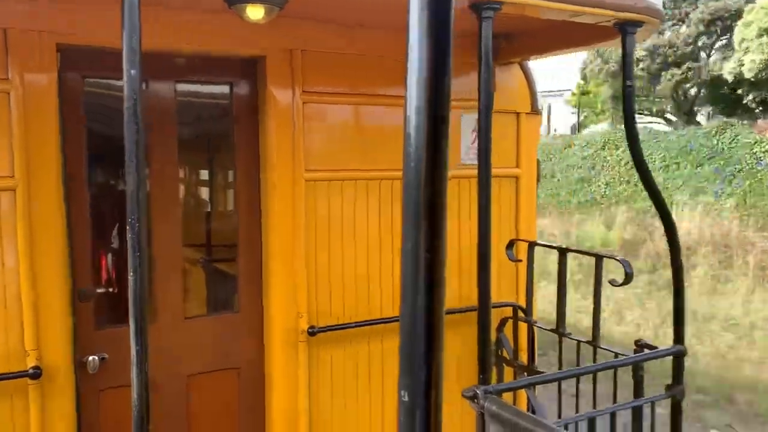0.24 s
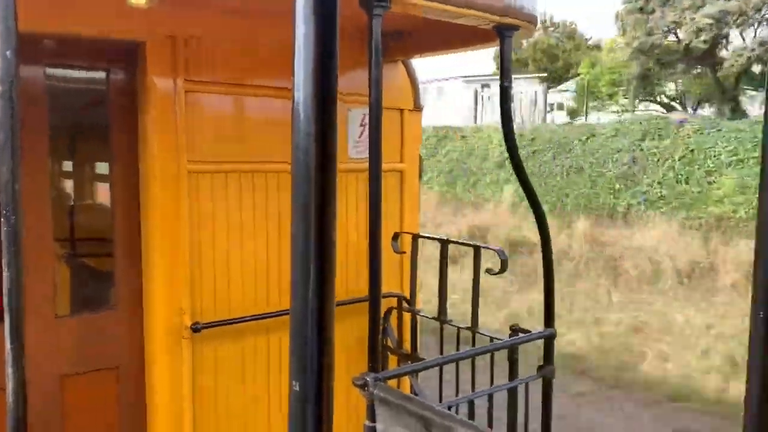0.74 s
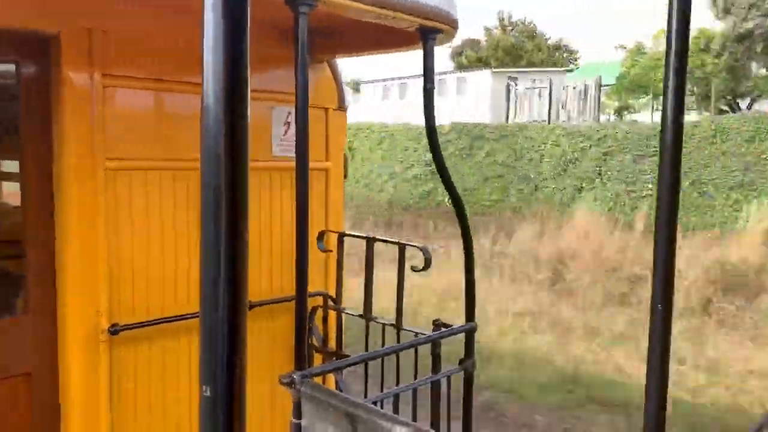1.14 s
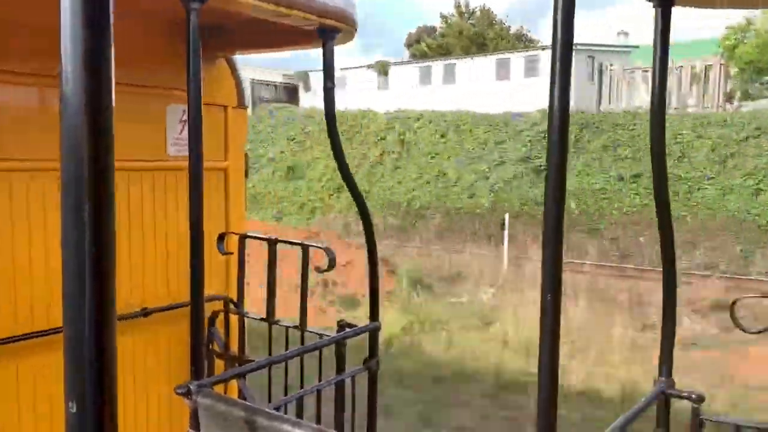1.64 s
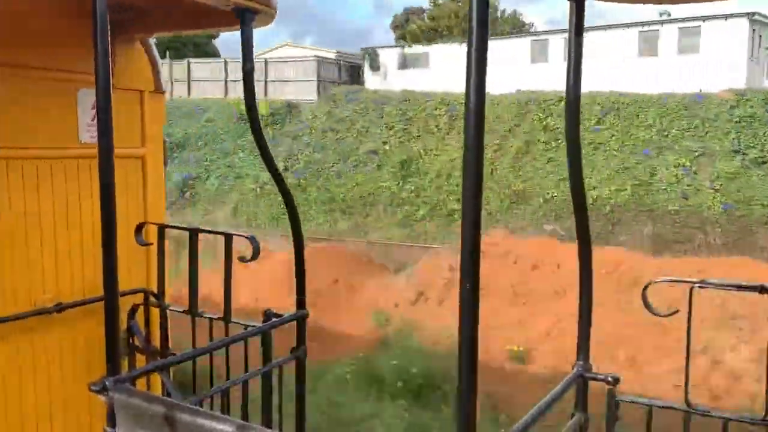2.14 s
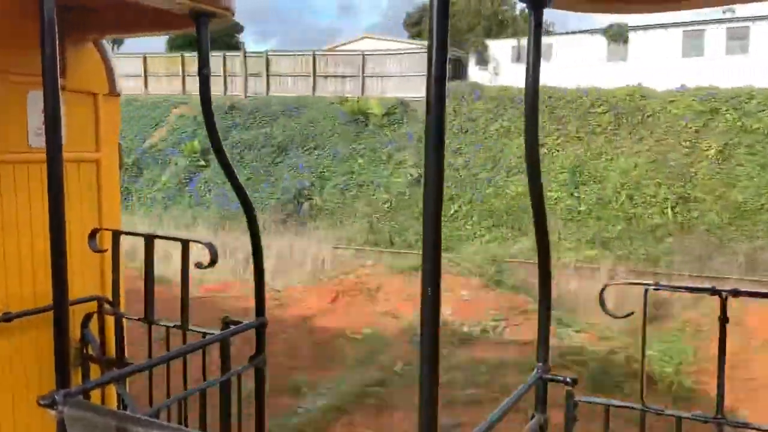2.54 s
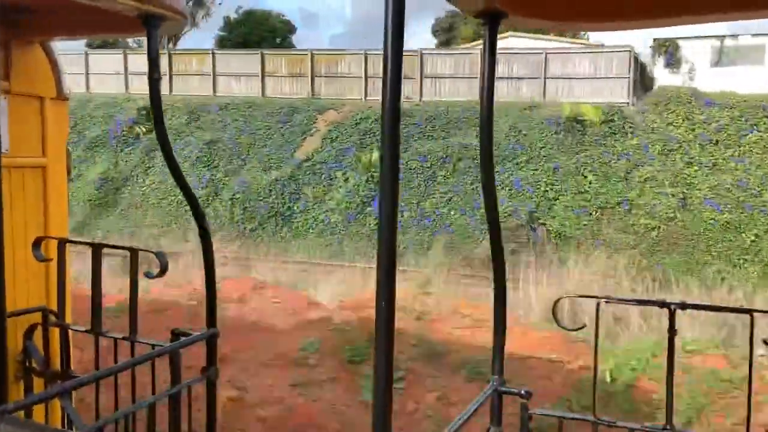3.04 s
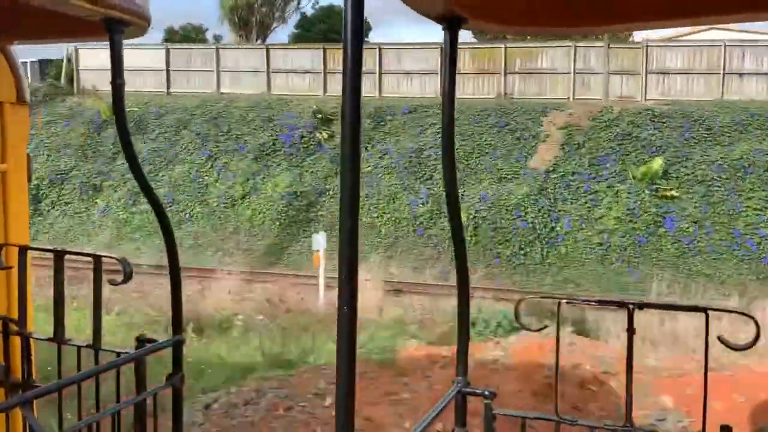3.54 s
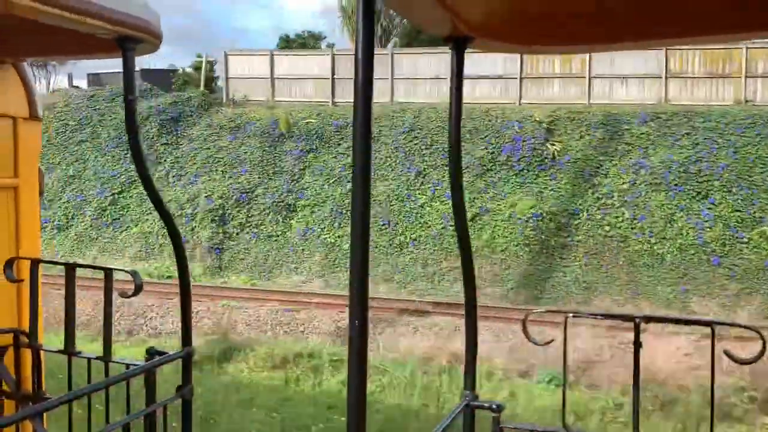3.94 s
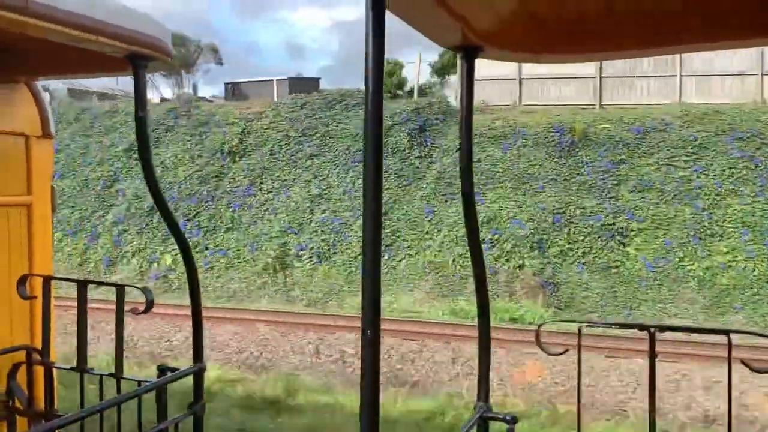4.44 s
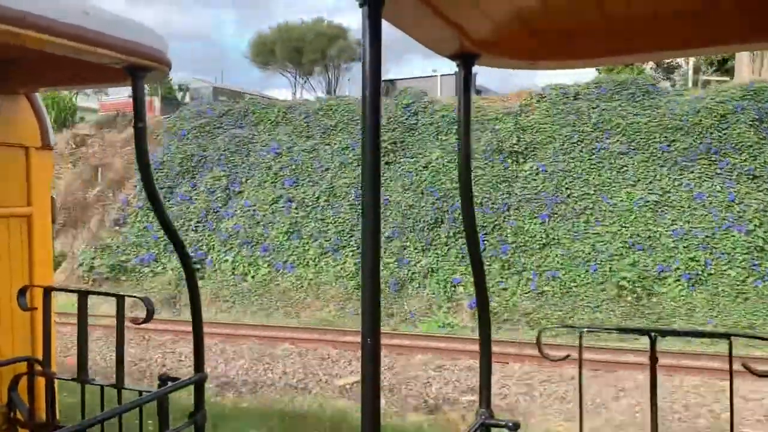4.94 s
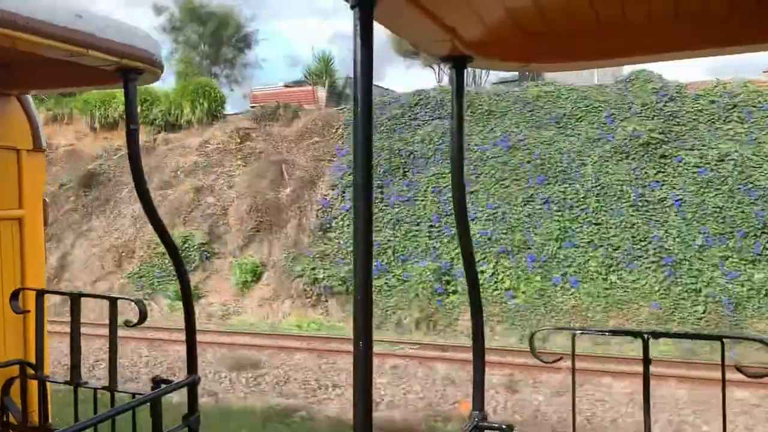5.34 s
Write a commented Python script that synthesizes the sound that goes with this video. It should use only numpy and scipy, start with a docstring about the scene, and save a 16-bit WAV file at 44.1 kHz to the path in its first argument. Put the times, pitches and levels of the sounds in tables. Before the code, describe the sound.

Train wheels rumble and clatter on rough track, with irregular thuds, ringing rails and light metal clanks, heard from an open platform.

```python
"""On the open end platform of a rolling railway carriage, heard at two spaced microphone ports.
Rough wheels on rough rails force the modes of frame, rail and wheel to ring over a broad roar.
Uneven track shakes the carriage into a low rumble, and a hiss rises from the running gear.
Impacts excite short transients: rail joints knock through the floor and loose ironwork clanks."""
import sys
import numpy as np
from scipy import signal
from scipy.fft import rfft, irfft, next_fast_len
from scipy.io import wavfile
from scipy.ndimage import uniform_filter1d

SR = 44100
rng = np.random.default_rng(int(sys.argv[2]) if len(sys.argv) > 2 else 0)


def unload_audio(sound):
    """Save the sound as a 16-bit wav file, at the path given as the first command line argument."""
    columns = np.transpose(np.atleast_2d(sound))
    # keep every value between -1 and 1, then stretch to whole-number steps
    steps = np.round(np.clip(columns, -1, 1) * 32767)
    wavfile.write(sys.argv[1], SR, steps.astype(np.int16))


N = 246078


def from_db(db):
    """Decibels to amplitude ratio."""
    return 10 ** (np.asarray(db) / 20)


def rms_one(x):
    """Normalisation to rms 1."""
    return x / np.sqrt(np.mean(x ** 2) + 1e-20)


def pan(pan_db):
    """Level difference between the ports, left over right."""
    return from_db([[pan_db / 2], [-pan_db / 2]])


def at_hz(points, hz):
    """Interpolation on a log-frequency axis."""
    freqs, values = np.transpose(points)
    return np.interp(np.log(hz), np.log(freqs), values)


def in_time(rows, column=1):
    """Linear interpolation in time, one value a sample."""
    columns = np.transpose(rows)
    return np.interp(np.arange(N) / SR, columns[0], columns[column])


def drift(rate_hz):
    """Random modulation: noise low-passed at rate_hz, rms about 1."""
    step, settle = 40, 2000
    pole = np.exp(-2 * np.pi * step * rate_hz / SR)
    noise = rng.standard_normal(N // step + settle + 2)
    slow = signal.lfilter([1], [1, -2 * pole, pole * pole], noise)[settle:]
    return np.interp(np.arange(N) / step, np.arange(len(slow)), rms_one(slow))


def delay(x, ms):
    """Fractional delay by linear phase shift."""
    size = next_fast_len(N)
    shift = np.exp(-2j * np.pi * np.fft.rfftfreq(size, 1 / SR) * ms / 1000)
    return irfft(rfft(x, size) * shift, size)[:N]


def ports(coherence, left_lead_ms, right_gain=1):
    """Partial coherence: one noise wave reaches the ports in turn, over a diffuse field."""
    wave, *diffuse = rng.standard_normal((3, N))
    direct = np.array([wave, right_gain * delay(wave, left_lead_ms)])
    return np.sqrt(coherence) * direct + np.sqrt(1 - coherence) * np.array(diffuse)


def resonance(x, hz, width_hz):
    """Two-pole resonator with unit peak gain."""
    r = np.exp(-np.pi * width_hz / SR)
    gain = (1 - r * r) / 2
    return signal.lfilter([gain, 0, -gain], [1, -2 * r * np.cos(2 * np.pi * hz / SR), r * r], x)


def steep_resonance(x, hz, width_hz):
    """Resonators in cascade: a second, twice as wide, steepens the skirts."""
    return resonance(resonance(x, hz, width_hz), hz, 2 * width_hz)


def bands(spectrum, noise_for, shared_db, own_db, own_hz):
    """Amplitude modulation: third-octave noise bands swell together and flicker alone; rms 1."""
    bottom_hz, top_hz = spectrum[0][0], spectrum[-1][0]
    edges = bottom_hz * 2 ** np.arange(0, np.log2(top_hz / bottom_hz) + 1 / 3, 1 / 3)
    out, swell = 0, drift(19.4) + drift(34.4)
    for k, (low, high) in enumerate(zip(edges, edges[1:])):
        hz = np.sqrt(low * high)
        bandpass = signal.butter(2, [low, min(high, SR / 2.2)], "band", fs=SR, output="sos")
        level_db = at_hz(spectrum, hz) + shared_db * swell + own_db * drift(own_hz)
        noise = noise_for(k % 2, hz)   # adjacent bands take independent noises
        padded = np.pad(noise, ((0, 0), (8000, 0)), "wrap")
        out = out + from_db(level_db) * signal.sosfilt(bandpass, padded)[:, -N:]
    return rms_one(out)


def through_floor(x, cutoff_hz=2370):
    """Transmission loss: the wooden floor takes the treble off blows from below."""
    return signal.sosfilt(signal.butter(4, cutoff_hz, fs=SR, output="sos"), x)


# Spectra of the deepest rumble and the rumble above it: frequency_hz, density_db
DEEP_SPECTRUM = [(18, -27), (30, 1), (50, 0.5), (65, -13)]
RUMBLE_SPECTRUM = [(55, -2), (80, 3), (100, 2.5), (125, -1), (160, 0), (225, -9), (290, -7.5)]
# Shaking over uneven track: time_s, deep_db, up_to_100_hz_db, above_100_hz_db
SHAKING = [(0.0, -45, -26, -12), (0.045, -4, -26, -31), (0.1, -32, -32, -26), (0.15, -16, -30, -16.5),
           (0.195, -17, -14, -21), (0.26, -33, -39, -27.5), (0.51, -36.5, -27, -30),
           (0.96, -20.5, -22, -21.5), (1.18, -31, -32.5, -32.5), (1.51, -22.5, -22, -27.5),
           (1.7, -37, -30.5, -25.5), (1.95, -30, -30, -28.5), (2.05, -19, -24.5, -21.5),
           (2.14, -29, -31.5, -30.5), (2.52, -41, -26.5, -26.5), (2.73, -18.5, -24, -23),
           (3.04, -30.5, -25.5, -24), (3.24, -22, -21, -17), (3.45, -27, -26.5, -23),
           (3.95, -29, -21.5, -20.5), (4.05, -20, -28, -18.5), (4.23, -23, -25.5, -20),
           (4.45, -30, -19.5, -25), (4.95, -31, -22.5, -20.5), (5.16, -28, -23, -18.5),
           (5.2, -25, -10, -17), (5.27, -24, -15, -19), (5.4, -20, -16.5, -18), (5.49, -23.5, -13.5, -16),
           (5.58, -33, -22, -37)]

def rumble():
    """Forced vibration: uneven track shakes frame and air in three bass ranges."""
    out = 0
    for column, spectrum in enumerate([DEEP_SPECTRUM, RUMBLE_SPECTRUM[:3], RUMBLE_SPECTRUM[2:]], 1):
        white = [ports(coherence=0.8, left_lead_ms=0.24) for _ in range(2)]
        lumps = bands(spectrum, lambda k, hz: white[k], shared_db=1.7, own_db=1.2, own_hz=3.7)
        out = out + from_db(in_time(SHAKING, column)) * lumps
    return out


HISS_LAG_MS = 0.3067   # left port behind right
# Spectrum of the running gear's hiss: frequency_hz, density_db
HISS_SPECTRUM = [(4000, -50), (6000, -19), (7500, 7), (9000, -4), (10500, -2.5), (11700, -0.5), (13500, -8),
                 (15500, -6.5)]

def hiss(treble_db):
    """Path difference: hiss from one side reaches the left port later, in opposite polarity."""
    white = [ports(coherence=0.9, left_lead_ms=-HISS_LAG_MS, right_gain=-1.1) for _ in range(2)]
    level_db = treble_db.mean() - 14.5 + 0.99 * (treble_db - treble_db.mean())
    noise = bands(HISS_SPECTRUM, lambda k, hz: white[k], shared_db=0.5, own_db=1.3, own_hz=9.0)
    return from_db(level_db) * noise


ROLLING_LEAD_MS = 0.2   # left port ahead of right
# Likeness of the roar at the two ports: frequency_hz, coherence
ROAR_COHERENCE = [(200, 0.85), (450, 0.96), (700, 0.31), (1200, 0.06), (8000, 0.09)]
# Balance of the roar, left over right: frequency_hz, pan_db
ROAR_BALANCE = [(60, 0.0), (110, 0.0), (200, 3), (380, -5), (700, 2.5), (1290, 4.5), (2380, 2),
                (4400, -0.5), (8120, -6), (15000, 0.0)]

def roar(spectrum, shared_db, own_db):
    """Spatial coherence: broadband rolling noise is alike at both ports only at low frequencies."""
    direct = [ports(0.74, ROLLING_LEAD_MS) for _ in range(2)]
    diffuse = rng.standard_normal((2, 2, N))

    def white(k, hz):
        coherence = at_hz(ROAR_COHERENCE, hz)
        field = np.sqrt(coherence) * direct[k] + np.sqrt(1 - coherence) * diffuse[k]
        return field * pan(at_hz(ROAR_BALANCE, hz))
    return bands(spectrum, white, shared_db, own_db, own_hz=9.8)


# Spectrum of the roar above 1 kHz: frequency_hz, density_db
HIGH_ROAR_SPECTRUM = [(900, 3.5), (1150, -5.5), (1400, -9), (1700, -10), (2600, -11), (4000, -16.5),
                      (5500, -21.5), (6600, -28), (8200, -97)]

def high_roar(treble_db):
    """Roughness excitation: the upper range of the rolling noise, flickering slightly."""
    return from_db(treble_db) * roar(HIGH_ROAR_SPECTRUM, shared_db=0.5, own_db=0.8)


def jolts(per_s=60):
    """Shot noise: small random bumps of the rail strike broad resonances; rms 1."""
    hits = rng.random(N) < per_s / SR
    strength = from_db(1.15 * np.minimum(rng.exponential(1, N), 4))
    clicks = hits * strength * rng.choice([-1, 1], N) + 1e-18
    body = resonance(resonance(clicks, 363, 320), 364, 580)
    edge = resonance(resonance(clicks, 870, 1160), 2120, 2200)
    bumps = body + 0.3 * edge
    return rms_one(through_floor(np.array([bumps, delay(bumps, ROLLING_LEAD_MS)])))


# Spectrum of the roar below 1 kHz: frequency_hz, density_db
LOW_ROAR_SPECTRUM = [(200, -30), (280, -16), (450, -8.5), (650, -2.5), (950, -13)]
# Envelope of that roar and its jolts: time_s, level_db
CLATTER = [(0, -26.5), (0.08, -24.5), (0.2, -26.5), (0.3, -31.5), (1.0, -28.5), (1.45, -24.5), (1.7, -28),
           (1.9, -26.5), (2.2, -32.5), (2.48, -20), (2.65, -26), (2.78, -24), (2.95, -27.5), (3.2, -22),
           (3.35, -24), (3.7, -25.5), (4.1, -23.5), (4.22, -23.5), (4.45, -25.5), (4.9, -22.5), (5.16, -27),
           (5.3, -16), (5.45, -24), (5.58, -21)]

def clatter():
    """Roughness excitation: the lower range of the rolling noise surges, mixed with jolts."""
    low_roar = roar(LOW_ROAR_SPECTRUM, shared_db=3.0, own_db=-0.95)
    return from_db(in_time(CLATTER)) * (low_roar + from_db(-1.5) * jolts())


# Modes of the loose ironwork: pitch_hz, level_db, width_hz
IRON_MODES = [(4700, -3, 150), (6550, 0, 60), (7800, -1, 120), (8300, -3, 60)]
# Strikes of iron on iron: start_s, peak_db, ring_over_burst_db
CLANKS = [(0.095, -28, -11), (0.362, -31, -6), (0.88, -30, -18), (1.751, -20, -16), (1.905, -33, -1),
          (1.948, -44, 5), (3.654, -28, -11), (4.272, -33, -7), (4.892, -38, 3)]

def clanks(rise_s=0.012, t60_s=0.13):
    """Transient excitation: iron chatters on iron in a bright burst that rings its modes."""
    t = np.arange(12000) / SR
    burst, ringing = np.zeros((2, N + len(t)))
    for start_s, peak_db, ring_db in CLANKS:
        chatter = rng.standard_normal(len(t)) * (1 - np.exp(-t / rise_s)) * from_db(-60 * t / t60_s)
        bright = resonance(chatter, 12200, 11000) + 1.3 * resonance(chatter, 5600, 3300)
        modes = sum(from_db(level_db + rng.normal(0, 3)) * rms_one(resonance(chatter, hz, width_hz))
                    for hz, level_db, width_hz in IRON_MODES)
        at = round(start_s * SR)
        burst[at:at + len(t)] += from_db(peak_db) * bright / np.max(np.abs(bright))
        ringing[at:at + len(t)] += from_db(peak_db + ring_db) * modes / np.max(np.abs(modes))
    return np.array([burst[:N], -delay(burst[:N], -HISS_LAG_MS)]) + ringing[:N] * pan(-4)


# Blows at the joints, below the floor: start_s, thud_db, pitch_hz, crack_db, pan_db
KNOCKS = [(0.019, -25, 507, -15, 6), (0.036, -7, 484, -15, 0), (0.046, -13, 524, -16, 0),
          (0.062, -3, 430, -16, -1), (0.097, -8, 453, -14, 3), (0.185, -7, 121, -27, -4),
          (0.844, -8, 144, -18, 1), (1.286, -11.5, 258, -13, -1), (1.454, -9, 340, -19, 2),
          (1.751, -15, 328, -11, 3), (1.849, -11, 420, -14, -3), (1.886, -17, 376, -13, 4),
          (1.995, -9.5, 242, -26, -1), (2.049, -9, 352, -33, 1), (2.081, -14, 597, -14, -1),
          (2.119, -13, 327, -28, 2), (2.427, -10, 480, -19, 6), (2.714, -16, 150, -24, 3),
          (2.729, -11, 420, -18, -6), (2.743, -6, 507, -9, 1), (2.757, -4, 420, -15, 0),
          (2.7595, -6, 170, -20, 0), (2.767, -11, 450, -24, -2), (2.786, -11, 432, -28, 2),
          (2.818, -8, 400, -22, -1), (2.830, -9, 300, -20, 0), (3.049, -10, 430, -15, 3),
          (3.117, -15, 363, -21, -12), (3.211, -7.5, 490, -24, -2), (3.275, -10, 367, -23, -6),
          (3.352, -6, 430, -17, -5), (4.017, -8, 203, -28.5, -1), (4.051, -8, 380, -14, 4),
          (4.1787, 1.5, 400, -16, 0), (4.189, -9, 70, -30, 0), (4.204, -9, 450, -12, 0),
          (4.212, -8, 90, -14, 0), (4.223, -7, 100, -18, 0), (4.249, -8, 60, -28, 0),
          (4.2096, -0.5, 390, -5.5, 1), (4.2334, 2, 283, -10, 0), (4.2386, 1, 750, -8, 4),
          (4.2435, -11, 600, -14, 5), (4.289, -7, 336, -24, 0), (4.583, -21, 366, -8, 1),
          (4.894, -20, 400, -8, -1), (5.017, -15, 297, -21, -2), (5.188, -10, 246, -31, 6),
          (5.213, -19, 200, -18, 3), (5.231, -8, 260, -28, -1), (5.256, -7, 350, -26, 1),
          (5.281, -14, 393, -10, 0), (5.318, -14, 400, -14, 4), (5.388, -8, 300, -14, -2),
          (5.466, -9, 200, -16, 0)]

def knocks(peak_cycles=0.45, rebound_hz=70):
    """Damped impact response: each joint gives a thud of a cycle or two, a slow rebound and a crack."""
    t = np.arange(4000) / SR
    out = np.zeros((2, N + len(t)))
    for start_s, thud_db, hz, crack_db, pan_db in KNOCKS:
        swell = hz * t / peak_cycles
        thud = np.sin(2 * np.pi * hz * t) * swell * np.exp(1 - swell)
        rebound = 0.2 * np.sin(2 * np.pi * rebound_hz * t) * np.exp(-t / 0.016)
        burst = rng.standard_normal(len(t)) * np.exp(-t / 0.0035)
        crack = steep_resonance(burst, hz=1150, width_hz=1200)
        blow = from_db(thud_db) * (thud - rebound) + from_db(crack_db) * crack / np.max(np.abs(crack))
        at = round(start_s * SR)
        out[:, at:at + len(t)] += pan(pan_db) * blow
    return through_floor(np.array([out[0, :N], delay(out[1, :N], ROLLING_LEAD_MS)]))


def rings(modes, envelope_db, flicker_db, steady=0):
    """Modal superposition: noise drives each mode; steady (0-1) evens out chance fading."""
    out = 0
    for hz, width_hz, level_db, coherence, lead_ms, pan_db in modes:
        ring = rms_one(steep_resonance(ports(coherence, lead_ms), hz, width_hz))
        out = out + from_db(level_db + flicker_db * drift(22.6)) * pan(pan_db) * ring
    power = uniform_filter1d(np.mean(rms_one(out) ** 2, axis=0), size=400) + .05
    return from_db(envelope_db) * rms_one(out / power ** (steady / 2))


# Modes of frame, rail and wheel: pitch_hz, width_hz, level_db, coherence, left_lead_ms, pan_db
FRAME_MODES = [(318.4, 25.4, -10, 0.85, 0.25, -4.5), (363, 41.7, -1.5, 0.91, 0.23, 2),
               (499, 104, -9, 0.97, 0.57, 2.5)]
RAIL_MODES = [(808.5, 64, 0, 0.88, -0.15, 0.8), (858, 37, 0, 0.9, -0.16, 3.3),
              (1236, 103, 0, 0.053, 0.32, 2.2)]
WHEEL_MODES = [(2018, 75, 0.5, 0.39, 0.21, 2.5), (2267, 124, 4.5, 0.55, 0.24, -0.5),
               (3124, 125, -5.5, 0.12, 0.1, -1.5), (3682, 160, -8.5, 0.11, 0.12, 4),
               (4210, 130, -11, 0.1, 0.12, -1), (4950, 160, -12.5, 0.1, 0.1, -1),
               (6660, 420, -13.5, 0.54, 0.016, -2)]
# Envelopes of the frame modes and the two lowest modes of rail and wheel: time_s, level_db
FRAME_ENVELOPE = [(0.0, -26.5), (0.15, -21.5), (0.2, -20), (0.23, -36), (0.34, -23), (0.37, -31.5),
                  (0.5, -22), (0.85, -26), (0.93, -20.5), (0.99, -22.5), (1.02, -38), (1.06, -23),
                  (1.09, -24.5), (1.41, -27), (1.52, -20.5), (1.55, -27), (1.58, -21), (1.62, -29.5),
                  (1.85, -23), (1.94, -31), (1.99, -23.5), (2.13, -25.5), (2.27, -19.5), (2.41, -24.5),
                  (2.52, -21.5), (2.67, -25), (2.72, -22.5), (2.97, -24), (3.03, -15.5), (3.09, -25.5),
                  (3.19, -16.5), (3.2, -20.5), (3.42, -17.5), (3.46, -35), (3.51, -19.5), (3.62, -25),
                  (3.68, -17.5), (3.84, -15.5), (3.87, -36), (3.9, -18), (3.98, -18), (4.01, -37),
                  (4.07, -19), (4.15, -24), (4.21, -25), (4.37, -20), (4.41, -19), (4.52, -25), (4.57, -20),
                  (4.91, -25), (4.94, -18), (4.97, -20.5), (5.13, -20), (5.16, -20.5), (5.19, -14.5),
                  (5.42, -26), (5.47, -14), (5.49, -27), (5.52, -17.5), (5.58, -34)]
RAIL_ENVELOPE = [(0.0, -46), (0.03, -21), (0.11, -50), (0.2, -29.5), (0.42, -50), (0.45, -25), (0.48, -37),
                 (0.65, -37), (0.68, -24.5), (0.78, -37), (0.92, -22.5), (0.96, -48), (1.01, -22),
                 (1.04, -44), (1.13, -35), (1.24, -22), (1.27, -28.5), (1.72, -38), (1.75, -25),
                 (1.89, -37), (2.0, -25), (2.1, -41), (2.14, -26), (2.22, -41), (2.27, -21.5), (2.3, -51),
                 (2.33, -19.5), (2.38, -32), (2.56, -20.5), (2.59, -32), (2.66, -22), (2.67, -41),
                 (2.86, -22), (2.91, -34), (2.95, -26), (3.01, -29), (3.28, -28), (3.37, -33), (3.4, -24),
                 (3.45, -26), (3.5, -26), (3.57, -31), (3.65, -19.5), (3.91, -29), (3.97, -15), (4.0, -28),
                 (4.03, -13), (4.05, -23), (4.07, -19), (4.09, -27.5), (4.23, -26.5), (4.35, -28),
                 (4.37, -27.5), (4.55, -25), (4.6, -19), (4.63, -31), (4.68, -16), (4.79, -34), (5.0, -28),
                 (5.02, -9.5), (5.04, -25), (5.56, -25), (5.58, -33)]
WHEEL_ENVELOPE = [(0, -35), (0.25, -33.5), (0.32, -31.5), (0.4, -32), (0.46, -34), (0.52, -34.5),
                  (0.6, -32), (0.72, -35.5), (0.9, -33.5), (1.58, -39), (1.82, -36), (1.85, -27),
                  (1.89, -41), (1.97, -31), (2.02, -37), (2.38, -35.5), (2.49, -32), (2.61, -36),
                  (3.0, -33), (3.15, -33), (3.21, -31), (3.28, -34), (3.335, -27), (3.43, -33), (3.76, -36),
                  (3.9, -27), (4.05, -30.5), (4.29, -33.5), (4.55, -29.5), (4.59, -28), (4.65, -28.5),
                  (4.79, -33), (4.82, -32), (5.21, -31.5), (5.28, -30), (5.32, -32), (5.58, -33)]

def singing(treble_db):
    """Forced resonance: roughness keeps frame, rail and wheel ringing; upper modes follow the high roar."""
    frame = rings(FRAME_MODES, in_time(FRAME_ENVELOPE), flicker_db=1, steady=0.75)
    rail = rings(RAIL_MODES[:2], in_time(RAIL_ENVELOPE), flicker_db=3.0, steady=0.55)
    wheel = rings(WHEEL_MODES[:2], in_time(WHEEL_ENVELOPE), flicker_db=2.9, steady=0.4)
    upper_rail = rings(RAIL_MODES[2:], treble_db - 6.5, flicker_db=4.5)
    upper_wheel = rings(WHEEL_MODES[2:], treble_db - 11, flicker_db=3.0)
    return frame + rail + wheel + upper_rail + upper_wheel


# Roar above 1 kHz as the ports turn from the carriage wall to the open track: time_s, level_db
TREBLE_ENVELOPE = [(0, -31.5), (0.6, -32.5), (1.5, -32), (2.2, -30.5), (3.0, -28.5), (3.9, -28),
                   (4.7, -27.5), (5.58, -28)]

def scene():
    """Superposition: all sources add at the ports; high roar, upper modes and hiss share an envelope."""
    treble_db = in_time(TREBLE_ENVELOPE)
    rolling = rumble() + clatter() + high_roar(treble_db) + singing(treble_db)
    return rolling + hiss(treble_db) + knocks() + clanks()


def record(dry, bass_cuts_hz=(24, 12), ceiling=1.06, treble_cut_hz=15750):
    """Band limiting and saturation: each port loses its deepest bass, peaks round off, the top is cut."""
    sound = np.array([signal.sosfilt(signal.butter(1, hz, "high", fs=SR, output="sos"), port)
                      for hz, port in zip(bass_cuts_hz, dry)])
    rounded = sound / (1 + (sound / ceiling) ** 4) ** .25
    return signal.sosfilt(signal.ellip(12, .5, 80, treble_cut_hz, fs=SR, output="sos"), rounded)


dry = scene()
out = record(dry)
unload_audio(out)
```